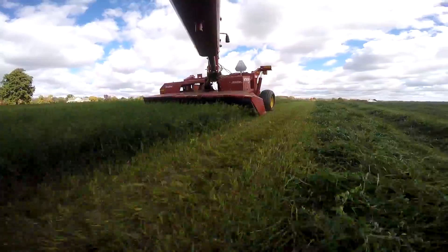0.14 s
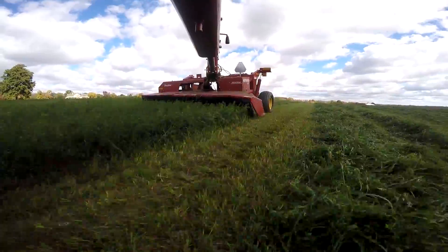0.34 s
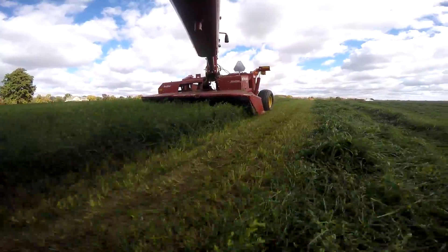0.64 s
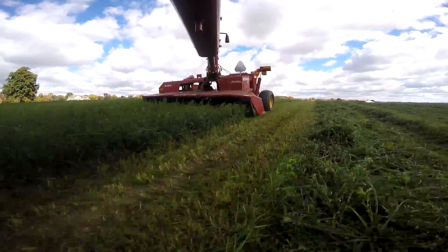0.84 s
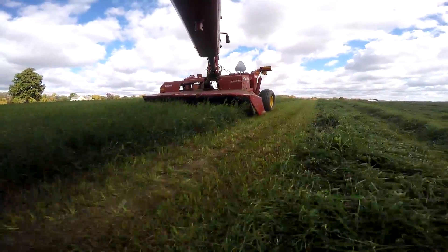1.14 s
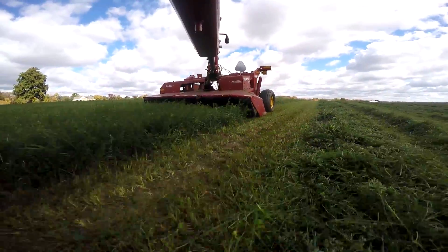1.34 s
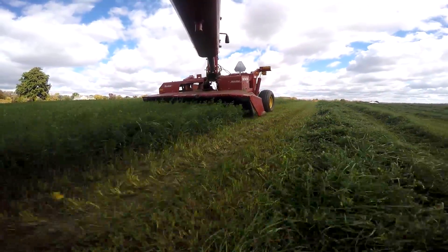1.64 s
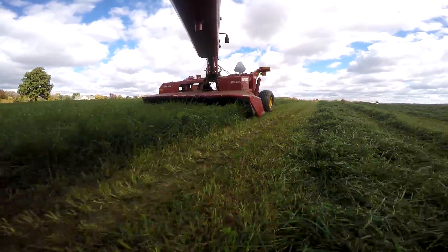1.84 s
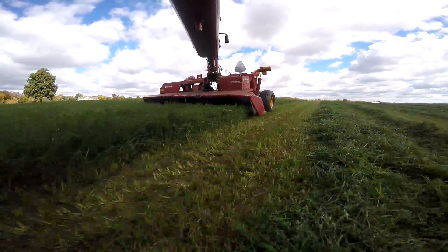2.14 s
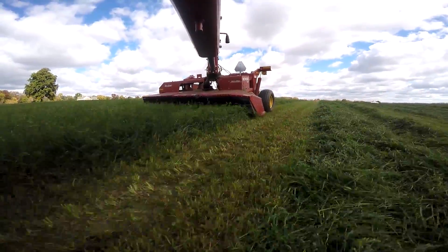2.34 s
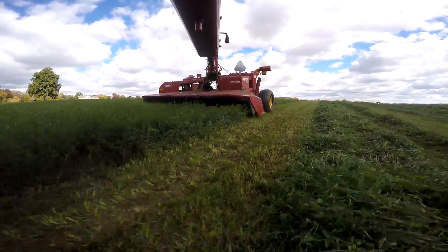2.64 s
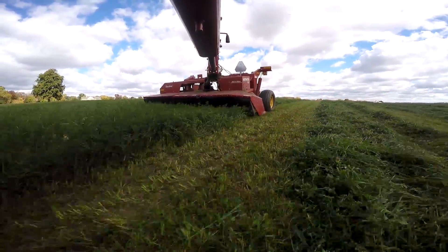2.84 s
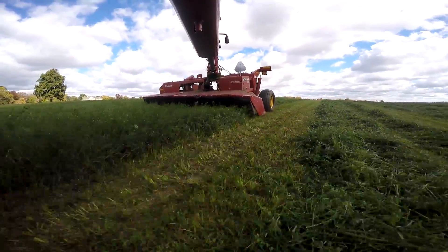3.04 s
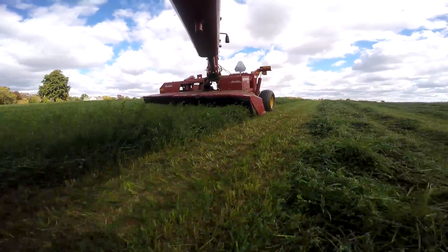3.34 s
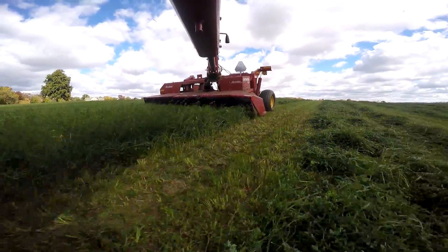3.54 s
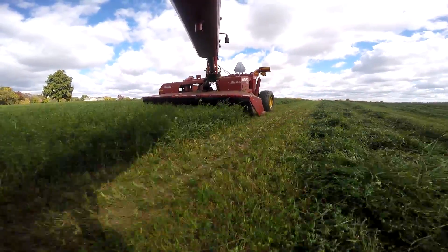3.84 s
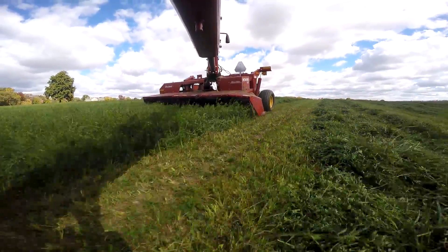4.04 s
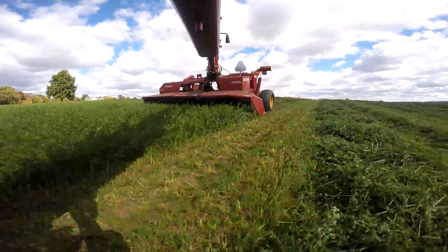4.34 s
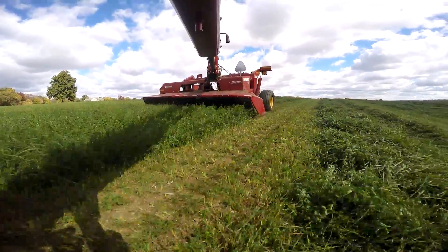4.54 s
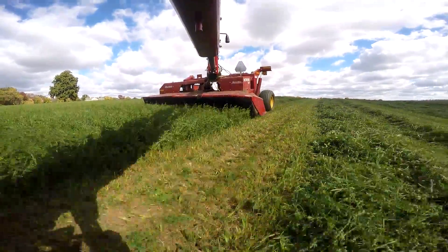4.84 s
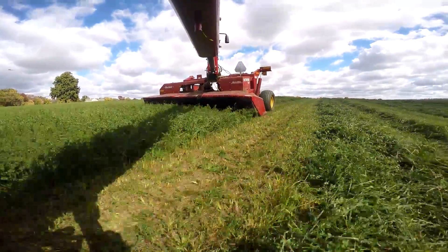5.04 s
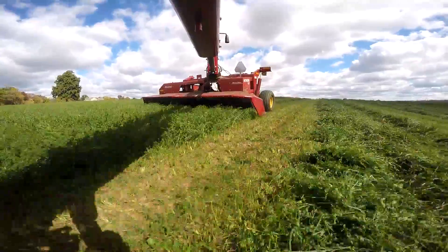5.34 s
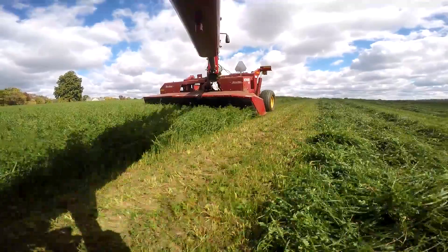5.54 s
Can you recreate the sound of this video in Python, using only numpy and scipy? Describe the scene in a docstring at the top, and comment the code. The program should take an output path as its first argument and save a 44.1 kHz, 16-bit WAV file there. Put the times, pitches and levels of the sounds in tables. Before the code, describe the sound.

Steady farm machinery at work outdoors: coarse casing chatter pulsing rapidly with a turning shaft, a wavering whine in the middle range, and a heavy low shudder of irregular jolts. Brief clacks and tiny dips in level interrupt it. The microphone is fixed to the vibrating tractor, so the bottom end is boomy and slightly overloaded, with no echo.

```python
"""A tractor tows a disc mower; a clamp on the tractor holds a camera and shakes with it.
From the start the drive shaft turns a 21-tooth gear: its whine is a sum of tooth-mesh harmonics, and its
rattle is modulated noise through a resonant steel casing. Brief lulls quieten both as the teeth unload.
Within the first tenth of a second the jolts begin, each exciting two low modes of the clamp; soon after come
the driveline's knocks, short noise cracks that ring the casing. All four continue to the end."""
import sys
import numpy as np
from scipy import signal
from scipy.fft import rfft, irfft, next_fast_len
from scipy.io import wavfile
from scipy.ndimage import map_coordinates

SR = 44100
rng = np.random.default_rng(int(sys.argv[2]) if len(sys.argv) > 2 else 0)


def put_to_file(sound):
    """Save the sound as 16-bit audio at rate SR, in the file named by the first command-line argument."""
    columns = np.atleast_2d(sound).T  # one column per channel
    safe = np.clip(columns, -1, 1)
    whole_steps = np.round(safe * 32767)
    wavfile.write(sys.argv[1], SR, whole_steps.astype(np.int16))


N = 250929


def amp(db):
    """Decibel law: the amplitude gain of a level in dB."""
    return 10 ** (np.asarray(db) / 20)


def unit(x):
    """Power normalization: x brought to rms 1."""
    return x / np.sqrt(np.mean(x ** 2) + 1e-20)


def curves(rows):
    """Linear interpolation: one value per sample for each column after the time."""
    times, *columns = np.transpose(rows)
    return [np.interp(np.arange(N) / SR, times, column) for column in columns]


def wobble(rate):
    """Band-limited fluctuation: a spline through random knots, rate knots a second."""
    knots = rng.standard_normal(int(N * rate / SR) + 4)
    return map_coordinates(knots, [np.arange(N) * rate / SR])


def filtered(x, response):
    """Linear filtering: the spectrum of x times a complex response of frequency."""
    m = next_fast_len(N + SR)  # padding leaves room for the ringing
    spectrum = rfft(x, m) * response(np.fft.rfftfreq(m, 1 / SR))
    return irfft(spectrum, m)[..., :N]


def split(x, low_hz, high_hz):
    """Complementary zero-phase crossover: low, middle and treble parts that add up to x."""
    low = filtered(x, lambda hz: 1 / (1 + (hz / low_hz) ** 8))
    high = filtered(x, lambda hz: 1 - 1 / (1 + (hz / high_hz) ** 8))
    return low, x - low - high, high


def casing(hz):
    """Minimum-phase resonance: the causal response of the steel casing, from its magnitude by the cepstrum."""
    # broad colour of the casing: (frequency [Hz], relative level per Hz [dB])
    colour = [(20, -13), (100, -2), (180, -5), (320, -5), (550, -0.5), (1000, -2), (1500, -6), (2100, -5.5),
              (3000, -12.5), (3700, -17.5), (4500, -33.5), (5500, -29), (6400, -34), (7250, -40),
              (8000, -42.5)]
    # bands that its panels ring at (+) or swallow (-): (centre [Hz], width at half the dB height [Hz], height [dB])
    panels = [(252, 50, 13.5), (393, 90, 15), (452, 75, 2), (731, 166, 8), (829, 58, -12), (888, 50, -7.5),
              (1124, 173, 5.5), (1862, 110, 10), (2160, 66, -4), (2291, 295, 13), (2670, 110, -4),
              (2764, 40, 10.5), (3090, 80, -4.5), (3208, 193, 10.5), (3326, 44, 6), (3980, 60, 4),
              (5110, 110, 6), (5540, 65, 4), (5930, 110, 13.5), (6026, 58, 7.5), (6700, 71, 8),
              (7660, 150, 13)]
    colour_hz, colour_db = np.transpose(colour)
    db = np.interp(np.log(hz + 1), np.log(colour_hz + 1), colour_db)
    db = db + sum(top / (1 + (2 * (hz - centre) / width) ** 2) for centre, width, top in panels)
    cepstrum = irfft(np.log(amp(db)))
    # folding negative time onto positive time makes the response causal
    cepstrum[1:len(hz) - 1] *= 2
    cepstrum[len(hz):] = 0
    return np.exp(rfft(cepstrum))


def shaft_angle():
    """Kinematics of rotation: the shaft's angle in radians is the integral of its speed."""
    # drive shaft: (time [s], speed [turns/s])
    speed = [(0, 17.26), (.75, 17.26), (1.18, 17.31), (1.32, 17.24), (1.6, 17.31), (1.85, 17.4),
             (2.25, 17.49), (2.5, 17.45), (2.9, 17.46), (3.05, 17.4), (3.45, 17.38), (3.9, 17.46),
             (4.5, 17.42), (4.85, 17.21), (5.4, 17.42), (5.69, 17.48)]
    return 2 * np.pi * np.cumsum(curves(speed)[0]) / SR


def lulls():
    """Load dependence of gear noise: dips in dB, as flat-topped pulses, while the teeth unload."""
    # nominal dips, scaled by each layer: (centre [s], length at 1/e of the depth [s], depth [dB])
    dips = [(0.03, 0.038, -4.5), (0.414, 0.018, -12), (0.459, 0.026, -11), (0.81, 0.024, 0),
            (0.86, 0.038, -4.5), (1.318, .03, -2), (1.679, 0.036, -3), (2.757, 0.069, -3),
            (3.086, 0.063, -4.5), (4.132, 0.017, -2), (4.639, 0.038, -4.5), (4.727, 0.034, -6),
            (5.068, .03, -4.5)]
    t = np.arange(N) / SR
    return sum(db * np.exp(-(2 * (t - s) / length) ** 4) for s, length, db in dips)


def clamp():
    """Forced vibration of damped modes: soft pushes and a fine tremor of randomly varying strength swing the clamp."""
    # jolts on the clamp: (time [s], relative strength [dB])
    jolts = [(0.06, 63.5), (.1265, 63), (0.2498, 64.5), (0.3183, 52), (0.4019, 61), (0.4592, 58.5),
             (0.5785, 65.5), (0.6554, 59.5), (0.6952, 64.5), (.7114, 58), (.8415, 64), (0.9162, 56),
             (0.9328, 62), (0.99, 65), (1.007, 54.5), (1.0973, 63), (1.2185, 65.5), (1.236, 55.5),
             (1.4057, 61), (1.46, 67), (1.5917, 52.5), (1.6304, 63.5), (1.7794, 52), (1.8083, 62.5),
             (1.8742, 56), (1.9187, 63.5), (1.9713, 52), (2.0838, 65.5), (2.1913, 64.5), (2.2097, 58.5),
             (2.2733, 63.5), (2.382, 63), (2.439, 66.5), (2.5326, 60.5), (2.5957, 61), (2.696, 58.5),
             (2.72, 58), (2.799, 64), (2.8178, 58), (2.8878, 59), (2.9686, 56.5), (3.001, 64), (3.07, 61),
             (3.1305, 60), (3.1829, 56), (3.2468, 64.5), (3.2856, 58), (3.4069, 63), (3.4348, 55.5),
             (3.4608, 60), (3.5211, 55), (3.651, 57), (3.745, 63.5), (3.8061, 55), (3.8654, 64),
             (3.9701, 62), (4.0387, 60), (4.121, 55), (4.149, 63), (4.164, 58.5), (4.3149, 61.5),
             (4.335, 59), (4.376, 59.5), (4.4301, 62), (4.506, 58), (4.5626, 59), (4.604, 58), (4.667, 62),
             (4.7546, 55), (4.8107, 55), (4.8468, 62.5), (4.9473, 60.5), (5.0057, 60), (5.1267, 60),
             (5.1981, 61.5), (5.2392, 58.5), (5.3015, 55), (5.3498, 61), (5.4357, 60.5), (5.4828, 57.5),
             (5.5366, 62.5), (5.551, 55), (5.5936, 61.5), (5.651, 64.5), (5.6839, 59.5)]
    # the main mode, then the low mode: (frequency [Hz], bandwidth [Hz], relative peak gain [dB])
    swing_modes = [(82.1, 5.9, 0), (53.5, 57, -24.4)]
    thud_db, thud_growth, thud_scatter_db = -1, 0.35, 2.1  # the low mode's share; growth in dB per dB of strength
    soft_hz = 72.6  # the push lasts a few milliseconds

    s, db = np.transpose(jolts)
    low_mode_db = db + thud_db + thud_growth * (db - db.mean())
    low_mode_db += thud_scatter_db * rng.standard_normal(len(s))
    samples = np.round(s * SR).astype(int)
    pushes = np.array([np.bincount(samples, amp(d), N)[:N] for d in (db, low_mode_db)])
    tremor_db = [[16], [22]] + 3.9 * wobble(23)
    pushes += amp(tremor_db) * rng.standard_normal((2, N))

    def response(f):
        """Resonance: each mode's velocity-type response to a push smoothed by two equal low-pass poles."""
        modes = np.array([amp(gain_db) * 1j * f * w / (c * c - f * f + 1j * f * w)
                          for c, w, gain_db in swing_modes])
        return modes / (1 + 1j * f / soft_hz) ** 2

    swing, thud = filtered(pushes, response)
    return swing - thud  # the modes swing in opposite phase


def knocks():
    """Impact excitation: the hardest contacts in the driveline ring each part of the casing at its own strength."""
    # contacts: (time [s], relative strength [dB], brightness [-1 near 1.1 kHz, 0 near 2.3 kHz, 1 in the treble])
    contacts = [(.131, 9.6, -1), (0.18, 6, 1), (.2483, 6.9, .4), (0.3181, 8.5, -0.82), (0.5618, 6.3, -0.58),
                (0.5849, 8.5, -1.1), (.7519, 6.5, 1), (1.0014, 7.1, 0.39), (1.4155, 12, -0.89),
                (1.4612, 7.4, -0.48), (1.5702, 7.8, -.9), (1.707, 12, 1.2), (1.9134, 4.5, 0.86),
                (2.0436, 4.3, 0), (2.0935, 7.5, .2), (2.1437, 9.8, 1.5), (2.4936, 11, -0.56),
                (2.7957, 8.1, 0), (2.9117, 6.7, -0.64), (3.1279, 10, .3), (3.2424, 6.8, .6),
                (3.3226, 5.4, .8), (3.408, 11, .3), (3.498, 10.5, -0.54), (3.6665, 7, -0.15),
                (3.6924, 11.5, 1), (3.716, 8.3, .8), (3.7731, 8.3, .7), (3.9427, 6.5, 0), (3.99, 6, 0.012),
                (4.2245, 9.2, -1.7), (4.289, 6.3, 1.4), (4.345, 9.4, .5), (4.4641, 9.2, -1.2),
                (4.5268, 4.7, -.8), (4.8177, 7.5, -0.62), (4.8853, 11, -1.2), (4.9207, 9.5, -.6),
                (4.9642, 8.6, .6), (5.0854, 6, -0.11), (5.1405, 5, 0.18), (5.1965, 8.5, -0.81),
                (5.3221, 9.2, 1.1), (5.3444, 10, .9), (5.501, 11, -.7)]
    t60_s, rise_s = 0.048, 0.003  # time to decay by 60 dB, time constant of the onset
    off_part_db = -9  # loss one step of brightness away from a part; grows as the square

    cracks = np.zeros((3, N + SR))
    t = np.arange(SR // 20) / SR
    envelope = amp(-60 * t / t60_s) * (1 - np.exp(-t / rise_s))
    for s, top_db, bright in contacts:
        db = top_db + off_part_db * (bright - np.arange(-1, 2)) ** 2
        crack = unit(envelope * rng.standard_normal((3, len(t))))
        start = round(s * SR)
        cracks[:, start:start + len(t)] += crack * amp(db)[:, None]
    rung = filtered(cracks[:, :N], casing)
    low = split(rung[0], low_hz=750, high_hz=1490)[1]
    mid = split(rung[1], low_hz=1520, high_hz=4100)[1]
    high = split(rung[2], low_hz=1500, high_hz=4240)[2]
    return amp(-16) * low + amp(-17.5) * mid + amp(-14.5) * high


def rattle(angle):
    """Amplitude-modulated noise: loose teeth and panels chatter, swelling with the shaft's turn, in the casing."""
    # base levels: (time [s], level of the body [dB], level of the treble [dB])
    levels = [(0, -19, -44), (.2, -18.5, -41.5), (.5, -20.5, -42.5), (.7, -18, -43), (.82, -20.5, -44.5),
              (.95, -18, -43.5), (1.5, -19.5, -42), (1.9, -18.5, -45), (2.15, -19, -42.5),
              (2.45, -19.5, -45.5), (3.02, -20, -44.5), (3.25, -19, -42.5), (3.7, -18.5, -40),
              (3.9, -19, -44), (4.3, -18.5, -41), (4.65, -20, -44.5), (4.9, -18, -40), (5.15, -19, -43),
              (5.35, -19, -41.5), (5.69, -18.5, -43.5)]
    body_db, treble_db = curves(levels)
    body_db = body_db + 0.5 * wobble(8.5)
    low_db = -1.12 + 1.1 * wobble(8.5)

    # small taps at random times, each decaying by 60 dB in 13 ms
    taps = np.zeros(N)
    draw = rng.random((1500, 2))
    taps[(draw[:, 0] * N).astype(int)] = draw[:, 1] ** 2
    decay = amp(-60 * np.arange(SR // 10) / SR / 0.013)
    bursts = signal.fftconvolve(taps, decay)[:N]

    turn_db = 1.22 * np.cos(angle - 2.2) + 0.23 * np.cos(2 * angle - 2.5)
    swell = amp(turn_db + 0.55 * wobble(14))
    chatter = swell * (1.34 + 1.02 * bursts) * rng.standard_normal(N)
    low, mid, high = split(filtered(chatter, casing), low_hz=760, high_hz=4410)

    # panels come and go on their own; the lulls weigh less on the upper bands
    lower_mid, _, upper_mid = split(unit(mid), low_hz=1528, high_hz=1730)
    dip_db = lulls()
    mid = amp(dip_db + 0.65 * wobble(16)) * lower_mid
    mid += amp(0.2 * dip_db + 1.5 * wobble(16)) * upper_mid
    rumble, _, low = split(unit(low), low_hz=300, high_hz=314)  # the narrow band between is left out
    body = amp(body_db) * (amp(-1.0) * rumble + amp(low_db + dip_db) * low + mid)
    treble = amp(treble_db + 0.3 * dip_db + 1.3 * wobble(7.7)) * unit(high)
    return body + treble


def whine(angle):
    """Gear meshing with phase modulation: universal joints vary the speed twice a turn, giving side tones."""
    # levels before random waver: (time [s], mesh tone [dB], its 4th multiple [dB], its 5th multiple [dB])
    tones = [(0, -31, -45, -37.5), (.2, -17, -28.5, -31), (.4, -25.5, -38, -39), (.56, -16, -30, -33.5),
             (.7, -23, -31, -25.5), (.95, -24, -38.5, -39), (1.15, -23, -35, -31.5),
             (1.35, -21, -30.5, -39), (1.55, -21, -30.5, -25.5), (1.87, -21, -29.5, -30.5),
             (2.2, -20, -29, -25), (2.9, -20.5, -28, -27), (3.08, -19.5, -30, -36),
             (3.27, -16.5, -29.5, -27.5), (3.45, -21.5, -36.5, -38.5), (3.9, -20, -34, -28),
             (4.2, -19.5, -36.5, -40.5), (4.55, -17.5, -39.5, -36.5), (4.85, -18, -35, -30),
             (5.06, -20.5, -39, -34), (5.4, -20, -35, -29.5), (5.69, -21.5, -27.5, -25)]
    teeth = 21
    mesh_db, fourth_db, fifth_db = curves(tones)
    mesh = teeth * angle + 0.12 * np.sin(2 * angle) + 0.14 * wobble(30)  # radians
    levels = [mesh_db, mesh_db - 12, mesh_db - 15.5, fourth_db, fifth_db, fifth_db - 14]
    waver = [1.5, 3.5, 1.5, 1.1, 3.0, 2.2]  # fast, dB, each tone on its own
    drift = [1.9, 1.5, 1.5, 1.2, 1.1, 1.2]  # slow, dB
    total = np.zeros(N)
    for multiple, (db, fast_db, slow_db) in enumerate(zip(levels, waver, drift), start=1):
        level_db = db + fast_db * wobble(22.02) + slow_db * wobble(8.5)
        phase = multiple * mesh + 2 * np.pi * rng.random()
        total += np.sqrt(2) * amp(level_db) * np.sin(phase)  # root 2: the levels are rms
    return total


def scene():
    """Superposition: clamp, knocks, rattle and load-dependent whine add up on one channel."""
    angle = shaft_angle()
    loaded_whine = amp(1.1 * lulls()) * whine(angle)
    return (clamp() + knocks() + rattle(angle) + loaded_whine)[None]


def record(dry):
    """Soft saturation and band limiting: the loudest peaks round off, then the top of the spectrum is cut."""
    top_hz = 7820
    rounded = dry / (1 + np.abs(dry / 0.98) ** 6) ** (1 / 6)
    return filtered(rounded, lambda hz: hz < top_hz)


dry = scene()
out = record(dry)
put_to_file(out)
```